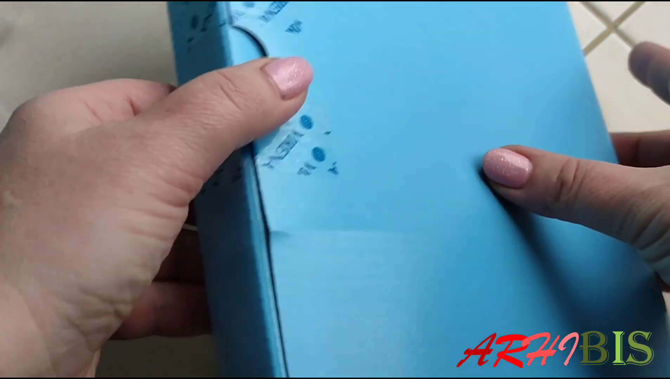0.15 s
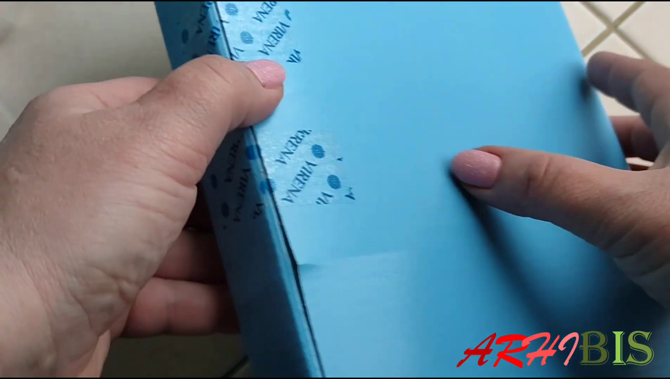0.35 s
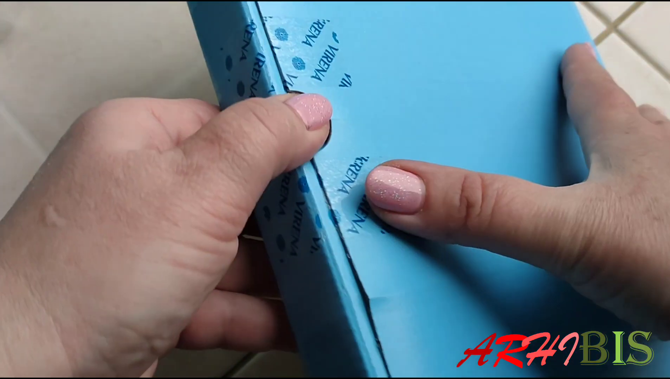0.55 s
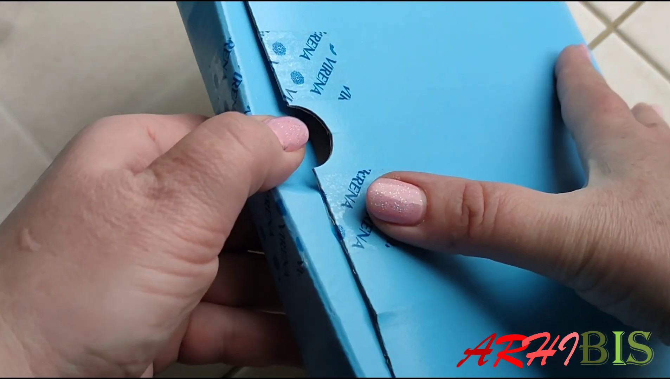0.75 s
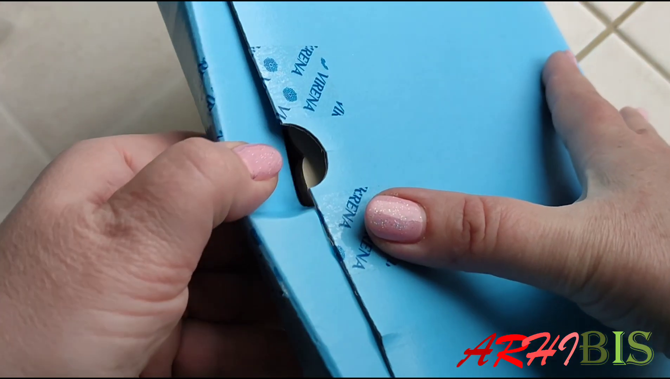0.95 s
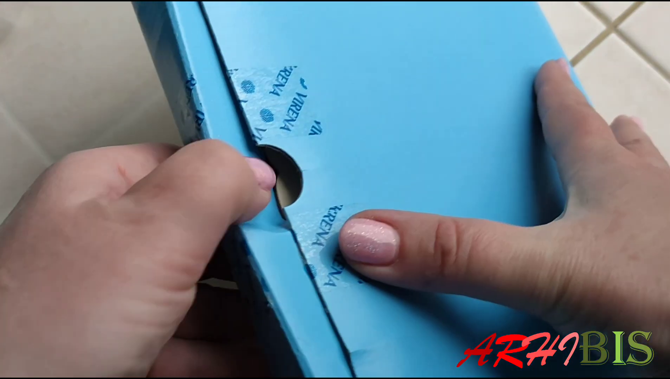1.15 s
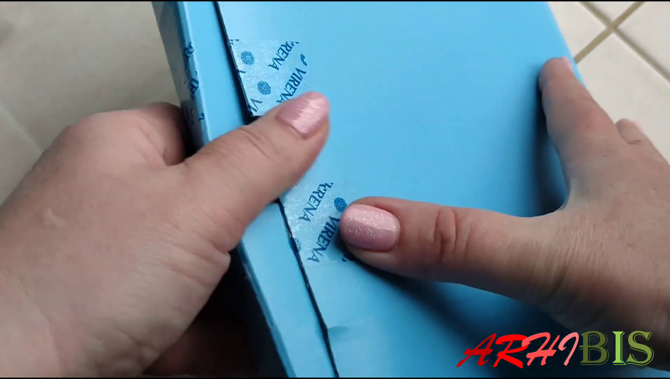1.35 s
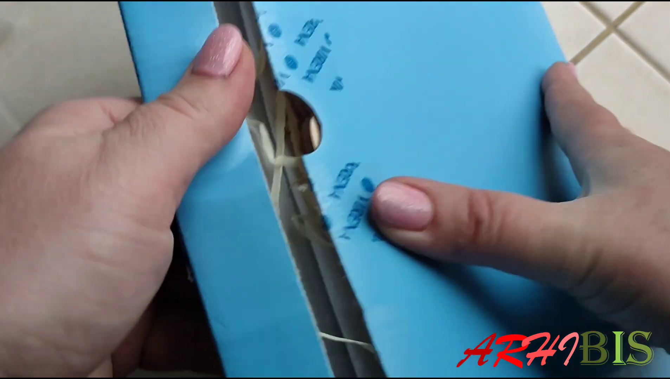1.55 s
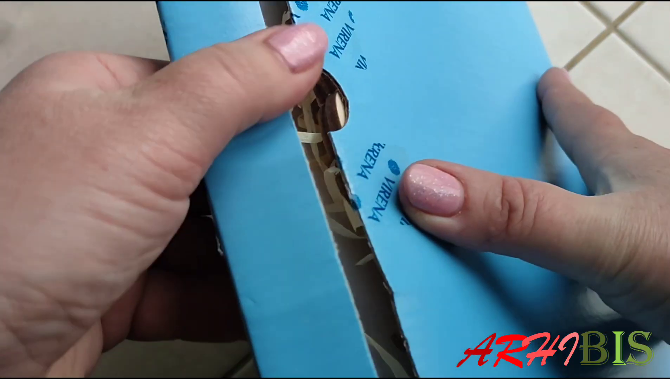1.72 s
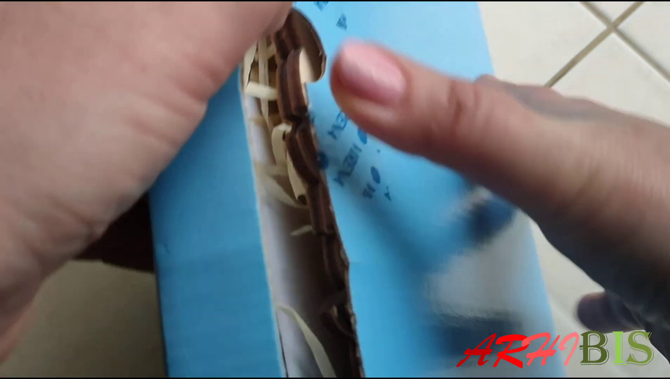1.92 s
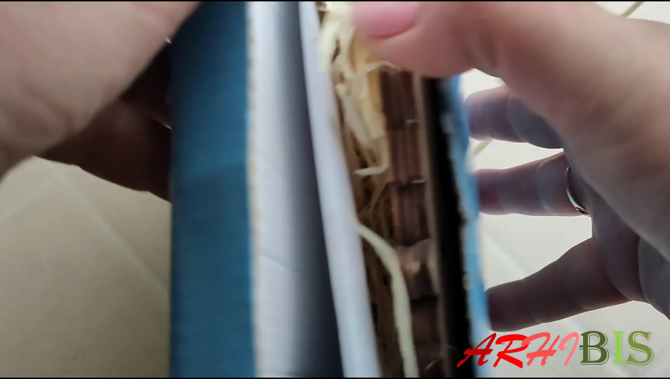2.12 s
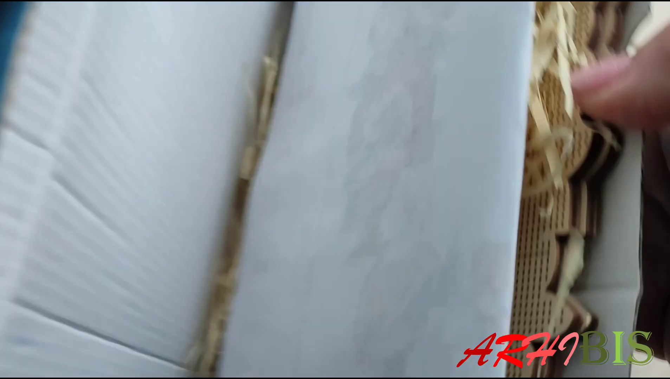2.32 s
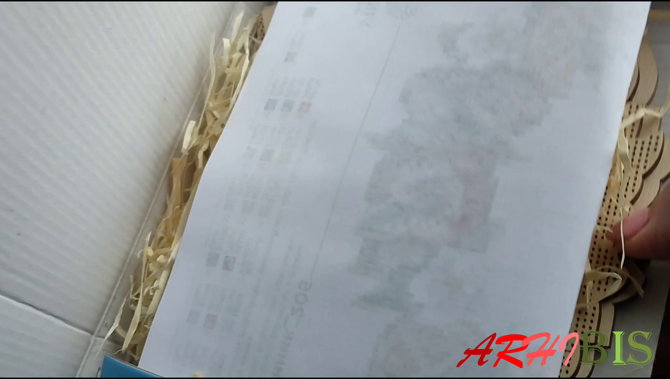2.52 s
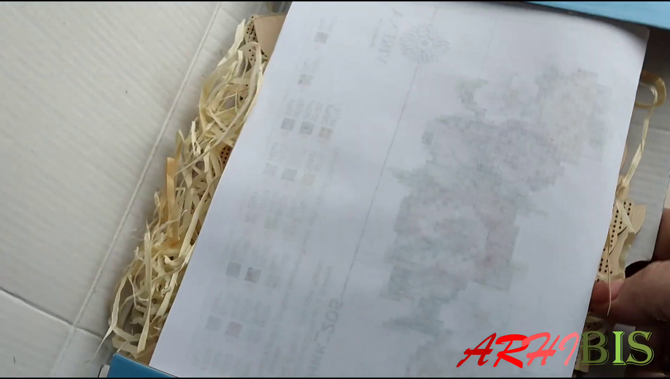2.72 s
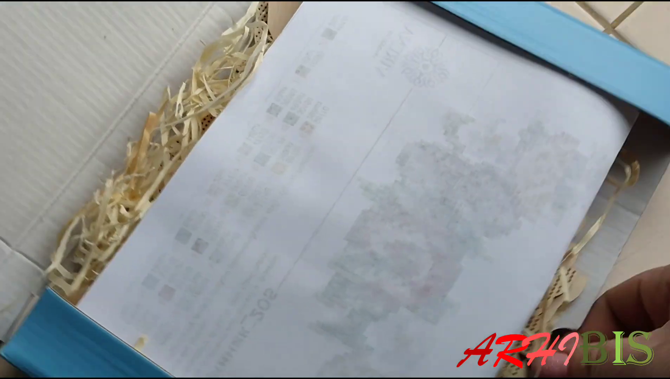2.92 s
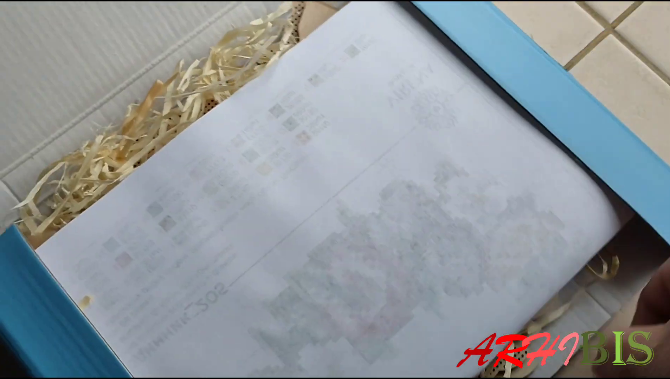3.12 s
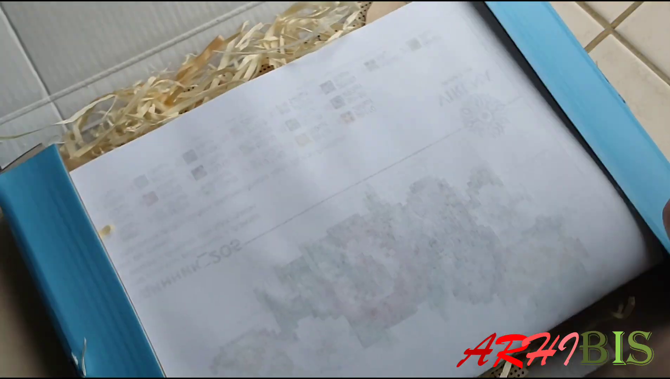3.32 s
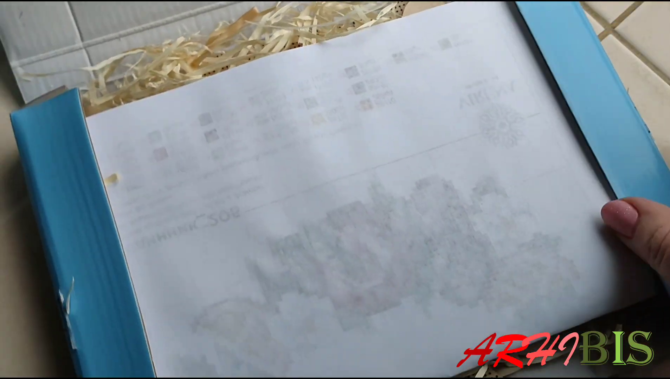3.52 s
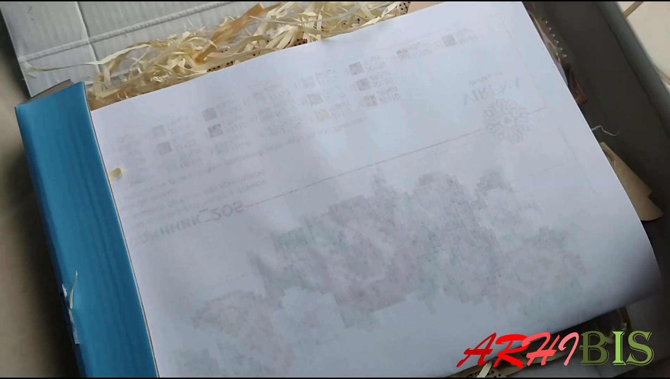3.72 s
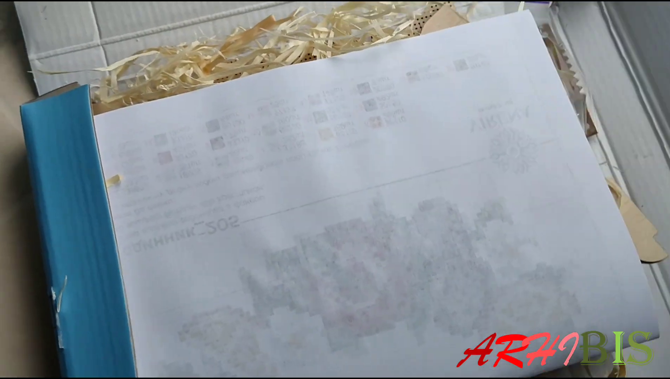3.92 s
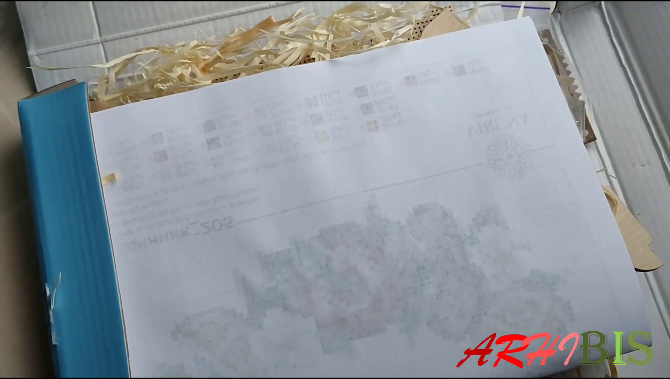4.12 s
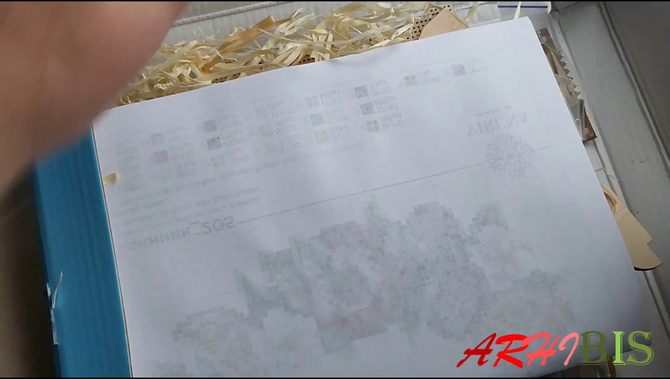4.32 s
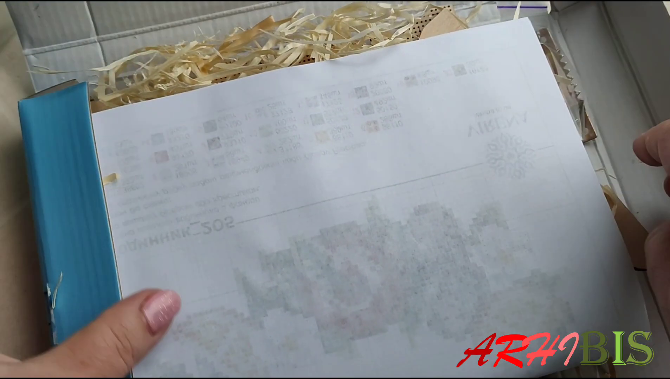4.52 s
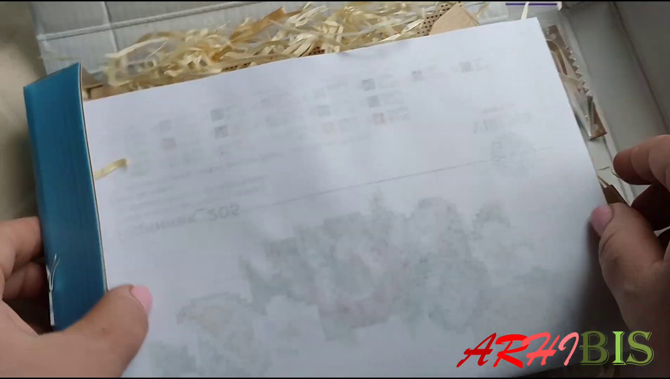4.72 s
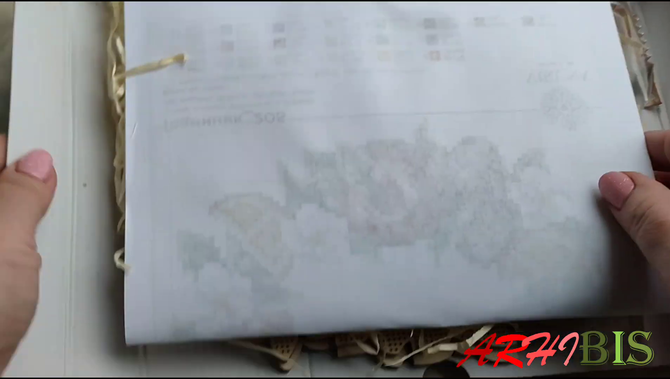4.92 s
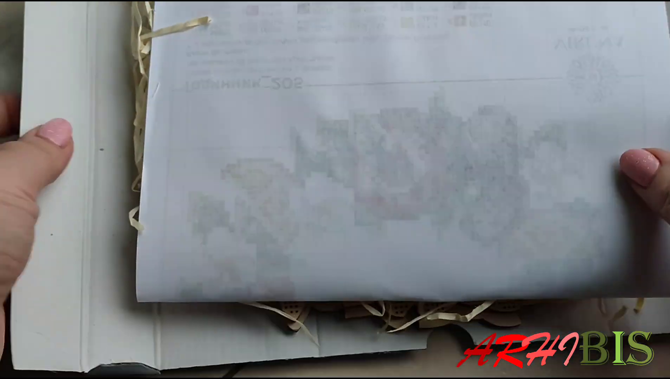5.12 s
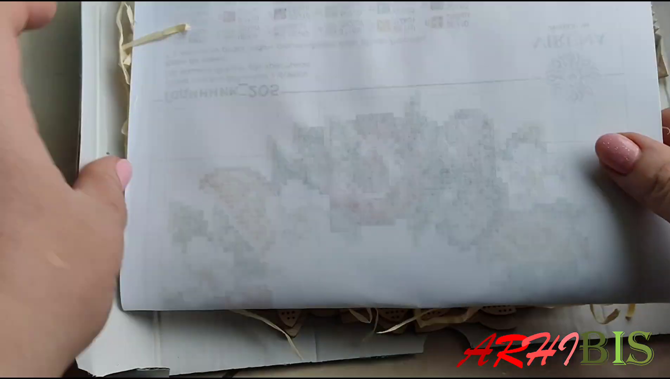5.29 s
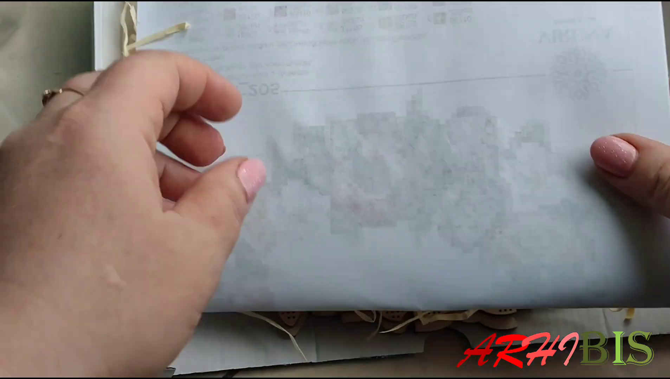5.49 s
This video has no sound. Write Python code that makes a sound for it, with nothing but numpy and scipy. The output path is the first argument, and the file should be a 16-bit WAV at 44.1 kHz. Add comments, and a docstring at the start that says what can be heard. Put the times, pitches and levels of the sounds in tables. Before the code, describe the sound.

A cardboard lid rasps and pops free, followed by close hollow knocks, sliding card and hissing paper packing.

```python
"""A corrugated cardboard box knocks and scrapes as hands open it on a tiled floor, close to a phone.
Fingers and folding flaps ring its panels, edges and enclosed air; the lid's tab rasps and pops free.
Rubbing and dragging drive the same resonances, while paper and wood shavings hiss among short dry ticks.
The room answers the knocks and ticks; now and then a faint thin squeak sounds over the room tone."""
import sys
import numpy as np
from scipy import signal
from scipy.fft import rfft, irfft, next_fast_len
from scipy.io import wavfile
from scipy.ndimage import uniform_filter1d, map_coordinates

SR = 44100
rng = np.random.default_rng(int(sys.argv[2]) if len(sys.argv) > 2 else 0)


def digitize_waveform(pressure):
    """Quantize a signal to 16-bit integers and store it at the path in sys.argv[1].

    Rows of a 2-D input are taken as channels; values are limited to [-1, 1].
    """
    field = np.atleast_2d(pressure).T
    bounded = np.clip(field, -1, 1)
    quanta = np.round(bounded * 32767).astype(np.int16)
    wavfile.write(sys.argv[1], SR, quanta)


N = 244755

# Box resonances: (frequency [Hz], width [Hz], gain [dB])
AIR_MODES = [(314.5, 73, -8.5), (379.5, 19, 0.5), (491.6, 35, -5.5), (608, 12, -5.5)]
PANEL_MODES = [(675, 71, -6), (839, 49, 0), (916, 51, -1), (1100, 100, -7), (1255, 120, -6.5)]
EDGE_MODES = [(1540, 320, -7.5), (1908, 140, 2.5), (2038, 240, -0.5), (2485, 220, -3.5), (2660, 180, -2),
              (3350, 540, -4.5), (3700, 1000, -9)]  # stiff folds and thin wood
# Air mode that moves as lid and flaps change the opening: (time [s], frequency [Hz])
OPENING_MODE = [(0, 512), (0.42, 590), (0.97, 387), (1.2, 430), (1.5, 597), (2.3, 640), (2.46, 348),
                (3.74, 392), (3.8, 467), (4.2, 412), (5.25, 451)]
# Blows, from hard edges to padded fingers and flaps:
# (time [s], level [dB], softness [0-1], struck spot [Hz], air gain [dB], crack gain [dB], L-R [dB])
BLOWS = [(0.006, -47.5, 1, 925, 13, -32, 5.5), (0.189, -66, 0.7, 700, 14, -1, 4.5),
         (0.286, -73.5, 1, 855, 24, 8, 5), (0.359, -77.5, 1, 1340, 25.5, 1, 4),
         (0.418, -55.5, 0.06, 910, 11, -0.5, 4), (0.59, -64, 0.1, 1240, 6, 5, 4),
         (0.968, -38, 0.04, 1164, 7, -3, -2), (1.135, -57.5, 1, 780, 15.5, -3, 3),
         (1.164, -40.5, 0, 963, -3, 0.5, 3), (1.235, -67, 0.9, 690, 15.5, -7, 2),
         (1.504, -44.5, 0.47, 1200, 9.5, 12.5, 2), (1.565, -17.5, 0, 1240, 0.5, -6.5, 3),
         (1.575, -25, 0, 900, 6, -13, 1.5), (2.038, -40, 0, 795, 0, -23, 3),
         (2.175, -52, 0.2, 740, 2.5, -21, -7), (2.284, -39.5, 0.03, 750, -1, -6, 5),
         (2.323, -45.5, 0, 820, -3, -1, -8), (2.385, -49, 1, 790, 0, -7, -3.5),
         (2.461, -44.5, 1, 690, 1, -11, -7.5), (2.667, -38, 0, 1020, -2.5, -5, 5),
         (3.011, -34.5, 0, 765, -5.5, -12, -3.5), (3.066, -52, 0.1, 1240, 3, -4, 0),
         (3.239, -43, 0.96, 1510, -1, 5, 2.5), (3.264, -41.5, 0.6, 1990, -4, -1, -4.5),
         (3.498, -55, 0.7, 1460, 6.5, 6, 3), (3.565, -45.5, 0, 1440, -1, -13, 2.5),
         (3.592, -50, 0, 1150, 3.5, -3, -2), (3.711, -62.5, 1, 1000, 15.5, 8, 3),
         (3.735, -39, 0, 870, -0.5, 0, -3), (3.786, -42.5, 0, 730, 4.5, -1, -1),
         (3.859, -45.5, 0.6, 1190, -5, 1, 2.5), (3.913, -57, 0.83, 900, 2.5, 0, 4),
         (3.958, -51, 0.15, 980, 4, 2, -1), (4.187, -52, 0, 835, 0, -12, 4),
         (4.228, -59, 0, 994, -7.5, 8.5, -3.5), (4.486, -65.5, 0.8, 856, -1, -2, 3),
         (4.519, -64.5, 0.92, 974, -2, 7.5, 2.5), (4.664, -62, 1, 1890, -4, 3.5, -3),
         (4.717, -51, 0.4, 1430, -17.5, -1, 2.5), (4.728, -45.5, 0, 1520, -6.5, 5.5, 7),
         (4.815, -54, 1, 1890, -8, 6, 1), (4.95, -45, 1, 736, 1, -3.5, -3.5),
         (5.02, -51, 0.74, 790, 9, -6, -3), (5.054, -51.5, 0.7, 1260, -7, 2, 3),
         (5.079, -57, 0, 1280, -8, 1, -0.5), (5.206, -42, 0.32, 1276, 8, 1, -2.5),
         (5.215, -44, 0.77, 1340, 3.5, -2.5, 5), (5.26, -54, 0.85, 1710, 13, -10, -2.5),
         (5.287, -57.5, 0.9, 1970, 10.5, 5, 7), (5.301, -50.5, 0.24, 1700, -13, 10, -2),
         (5.331, -56.5, 1, 1820, 6.5, 7, 1)]


def blows(wet_db):
    """A contact force rings the air, panels, struck spot and edges; its rough part cracks."""
    out, t = np.zeros((2, N + SR)), np.arange(SR // 3) / SR
    hard, soft = np.array([[0.0013, 0.0061, 1.3], [0.01, 0.01, 6.3]])  # (rise [s], decay [s], roughness)
    grip_decay_s = 0.028  # hands damp the card
    port_delay_s_per_db = 22e-6  # the louder port is nearer and hears the blow first
    for time_s, level_db, softness, spot_hz, air_db, crack_db, pan_db in BLOWS:
        rise_s, decay_s, roughness = hard * (soft / hard) ** softness
        # A broad blow wakes the air, lasts longer and rings the edges less.
        decay_s *= amp(0.48 * (air_db - 0.5))
        edge_db = -6 - 0.64 * air_db
        grit = (1 - np.exp(-t / rise_s)) * np.exp(-t / decay_s) * rng.standard_normal((3, len(t)))
        force = roughness * grit[0] + np.exp(-t / 0.00011)
        opening_hz = np.interp(time_s, *np.transpose(OPENING_MODE))
        air = amp(air_db) * ring(force, AIR_MODES + [(opening_hz, 55, 1.5)])
        panel = ring(force, PANEL_MODES) + 0.75 * ring(force, [(spot_hz, 0.037 * spot_hz, 0)])
        edge = amp(edge_db) * ring(force, EDGE_MODES)
        thud = amp(-24.5) * ring(force, [(60, 210, 0)])
        gain = amp(level_db) * np.sqrt(decay_s * SR + 60)
        body = gain * np.exp(-t / grip_decay_s) * (panel + air + edge + thud)
        crack = gain * amp(crack_db) * ring(grit[1:], [(6900, 58000, 0)])
        lead = lambda hz: np.exp(np.outer([1, -1], 1j * np.pi * hz * pan_db * port_delay_s_per_db))
        direct = (filtered(body, lead) + crack) * amp([[pan_db / 2], [-pan_db / 2]])
        add(out, time_s, direct + reverb(body + crack[0], wet_db))
    return out[:, :N]


def tab():
    """The lid's tab rasps, swelling until it lets go."""
    release_s, release_db = 1.563, -26
    swell_db_per_s, fall_db_per_s = 649, 719.5
    t = np.arange(N) / SR - release_s
    level_db = release_db + np.minimum(swell_db_per_s * t, -fall_db_per_s * t)
    rasp = friction(resonant([(1180, 2300, -6.5), (6530, 17000, -10.5)]), rate_hz=400, flutter_db=-2.5)
    return amp(level_db) * rasp


# Sliding of hands and box: (time [s], card scrape [dB], paper and shavings hiss [dB])
RUB_LEVELS = [(0.0, -50, -58.5), (0.08, -59, -65.5), (0.15, -72.5, -75), (0.22, -67, -66.5),
              (0.5, -67.5, -67.5), (0.82, -67, -76.5), (0.92, -75, -80), (0.96, -67.5, -73),
              (1.0, -52.5, -60), (1.13, -60.5, -67), (1.2, -59.5, -55), (1.3, -64, -62.5),
              (1.43, -63.5, -65.5), (1.52, -43, -49), (1.7, -49, -51), (2.05, -50.5, -51.5),
              (2.4, -47.5, -47.5), (2.7, -53, -51.5), (2.92, -59, -58), (3.02, -49.5, -51.5),
              (3.27, -48, -45.5), (3.45, -52.5, -56), (3.53, -49, -52), (3.67, -60, -65.5),
              (3.78, -51, -57.5), (3.98, -57, -59.5), (4.06, -65, -70), (4.25, -67.5, -72.5),
              (4.36, -74.5, -81.5), (4.52, -71.5, -83.5), (4.7, -63.5, -65.5), (4.74, -55.5, -56),
              (4.82, -54, -54), (4.92, -52.5, -53), (5.08, -52, -55), (5.3, -57.5, -61.5),
              (5.42, -64, -67.5), (5.55, -71.5, -66.5)]
# Friction spectra: (frequency [Hz], relative density [dB])
SCRAPE_SPECTRUM = [(400, -32.5), (650, -9), (800, -6.5), (1300, -5.5), (2100, -7.5), (3200, -13.5),
                   (5000, -29.5), (9000, -94.5)]
HISS_SPECTRUM = [(900, -31.5), (1800, -7.5), (3000, -4), (6000, -1.5), (10000, -6), (16000, -7.5)]


def rubbing():
    """Sliding card drives the box's air, panels and edges; paper and shavings hiss."""
    scrape_db, hiss_db = curves(RUB_LEVELS)
    drone_db = -59.5 + 0.71 * (scrape_db + 55) + 3.5 * wobble(rate_hz=9)
    drone = friction(resonant(AIR_MODES), rate_hz=40, flutter_db=2.5)
    card = resonant(PANEL_MODES + EDGE_MODES)
    scrape_response = lambda hz: amp(log_interp(SCRAPE_SPECTRUM, hz)) * (1.2 + np.abs(card(hz)))
    scrape = friction(scrape_response, rate_hz=60, flutter_db=2.0, patch_db=2.3)
    hiss = friction(lambda hz: amp(log_interp(HISS_SPECTRUM, hz)), rate_hz=50, flutter_db=0.6, patch_db=1.9)
    return amp(drone_db) * drone + amp(scrape_db) * scrape + amp(hiss_db) * hiss


# Dry ticks: (time [s], level [dB], band centre [Hz])
TICKS = [(0.091, -47, 6800), (0.222, -46, 7400), (.986, -48, 11000), (2.140, -40, 14500),
         (2.556, -33, 9000), (2.658, -31, 15400), (2.680, -31.5, 15400), (3.690, -38, 13000),
         (3.726, -44, 9000), (4.010, -47, 8030), (4.037, -47, 6460), (4.096, -49, 13000),
         (4.198, -47, 9080), (4.422, -59, 11030), (4.480, -55.5, 4950), (5.127, -45, 7300),
         (5.303, -36, 3420), (5.383, -42, 5000), (5.483, -43.5, 13800)]


def ticks():
    """Short dry ticks, some very high and thin, each lasting a few milliseconds."""
    out, t = np.zeros((2, N + SR)), np.arange(SR // 8) / SR
    rise_s, decay_s = 0.0016, 0.0045
    envelope = (1 - np.exp(-t / rise_s)) * np.exp(-t / decay_s)
    for time_s, level_db, hz in TICKS:
        burst = envelope * rng.standard_normal((2, len(t)))
        tick = amp(level_db) * filtered(burst, resonant([(hz, 0.9 * hz, 0)]))
        add(out, time_s, tick + reverb(tick[0], wet_db=-13))
    return out[:, :N]


# Squeaks: (start [s], end [s], frequency [Hz], width [Hz], level [dB])
SQUEAKS = [(.61, .82, 3500, 35, -81), (.84, .94, 3500, 35, -87), (.76, .93, 7000, 50, -91),
           (1.2, 1.4, 3380, 30, -77), (1.64, 1.86, 3200, 100, -69), (1.62, 1.85, 5700, 120, -69),
           (2.86, 3.0, 1850, 100, -70), (3.08, 3.26, 2800, 100, -66)]


def squeaks():
    """Narrow bands of noise fade in and out as faint thin squeaks."""
    out, t = np.zeros(N), np.arange(N) / SR
    fade_s = 0.025
    for start_s, end_s, hz, width_hz, level_db in SQUEAKS:
        fade = np.clip(np.minimum(t - start_s, end_s - t) / fade_s, 0, 1)
        band = filtered(rng.standard_normal(N), resonant([(hz, width_hz, 0)]))
        out += amp(level_db) * fade * unit_rms(band)
    return out


# Room decay: (frequency [Hz], T60 [s])
ROOM_T60 = [(300, 0.35), (650, 0.36), (1200, 0.23), (4000, 0.22), (12000, 0.19)]


def reverb(x, wet_db):
    """The room returns a diffuse stereo tail that dies faster in the treble."""
    predelay_s = 0.008
    hz, t, spectra = signal.stft(rng.standard_normal((2, SR // 3)), SR, nperseg=256)
    decay = amp(-60 * t / log_interp(ROOM_T60, hz)[:, None])
    tail = signal.istft(spectra * decay, SR, nperseg=256)[1]
    delayed = np.pad(x, (round(predelay_s * SR), 0))[None]
    return amp(wet_db) * signal.fftconvolve(delayed, tail / np.linalg.norm(tail[0]), axes=1)[:, :len(x)]


# Room tone: (frequency [Hz], relative density [dB])
ROOM_SPECTRUM = [(30, -14.5), (200, 13.5), (400, 6), (800, 4), (1500, 3.5), (3000, -24.5), (6000, -26.5),
                 (16000, -49.5)]


def room_tone():
    """Faint, dull noise that wavers slightly."""
    return amp(-74) * friction(lambda hz: amp(log_interp(ROOM_SPECTRUM, hz)), rate_hz=6.3, flutter_db=0.7)


# Stereo likeness of the noise: (frequency [Hz], L-R correlation [0-1])
CORRELATION = [(250, 1), (640, 0.18), (1400, 0.021), (16000, 0.012)]


def friction(response, rate_hz, flutter_db, patch_db=0):
    """Stereo noise in uneven slips and shifting patches of colour, shaped by what it excites; rms 1."""
    def mid_side_response(hz):
        angle = np.arccos(log_interp(CORRELATION, hz)) / 2
        return response(hz) * [np.cos(angle), np.sin(angle)]

    spectra = signal.stft(rng.standard_normal((2, N)), nperseg=512)[2]
    patches = uniform_filter1d(rng.standard_normal(spectra.shape[1:]), size=3, axis=0)
    patches = unit_rms(uniform_filter1d(patches, size=14, axis=1))
    noise = signal.istft(spectra * amp(patch_db * patches), nperseg=512)[1][:, :N]
    mid, side = filtered(amp(flutter_db * wobble(rate_hz)) * noise, mid_side_response)
    return unit_rms(np.array([mid + side, mid - side]))


def ring(force, modes):
    """Modes driven by a force; energy 1."""
    motion = filtered(force, resonant(modes))
    return motion / np.linalg.norm(motion)


def resonant(modes):
    """Causal response of (frequency [Hz], width [Hz], gain [dB]) modes, alternating in sign."""
    return lambda f: sum((-1) ** k * amp(db) * 1j * f * width / (hz * hz - f * f + 1j * f * width)
                         for k, (hz, width, db) in enumerate(modes))


def filtered(x, response):
    """Apply a complex frequency response."""
    size = next_fast_len(x.shape[-1] + SR // 4)
    return irfft(rfft(x, size) * response(np.fft.rfftfreq(size, 1 / SR)), size)[..., :x.shape[-1]]


def wobble(rate_hz):
    """Smooth random curve with rate_hz knots a second."""
    knots = rng.standard_normal(int(N * rate_hz / SR) + 4)
    return map_coordinates(knots, [np.arange(N) * rate_hz / SR])


def curves(rows):
    """One value per sample for each column after the time."""
    times_s, *columns = np.transpose(rows)
    return [np.interp(np.arange(N) / SR, times_s, column) for column in columns]


def log_interp(points, hz):
    """Interpolate (frequency [Hz], value) points on a log axis."""
    knots_hz, values = np.transpose(points)
    return np.interp(np.log(hz + 1), np.log(knots_hz + 1), values)


def amp(db):
    return 10 ** (np.asarray(db) / 20)


def unit_rms(x):
    return x / np.sqrt(np.mean(x ** 2) + 1e-20)


def add(out, time_s, sound):
    out[:, round(time_s * SR):][:, :sound.shape[1]] += sound


def scene():
    """The box, its packing and the room, in stereo."""
    return rubbing() + tab() + blows(wet_db=-8.0) + ticks() + room_tone() + squeaks()


# Phone microphone: (frequency [Hz], gain [dB])
MIC_RESPONSE = [(30, -27.5), (185, -33.5), (232, -26.5), (282, -5.5), (340, -2), (4000, -2.5), (5000, -8),
                (5900, -4.5), (6800, 3), (8000, -2), (9500, -8), (13300, -11.5), (15400, -4.5)]


def record(dry):
    """The phone cuts the bass steeply, colours the treble at its ports and limits the band."""
    def minimum_phase(hz):
        cepstrum = irfft(np.log(amp(log_interp(MIC_RESPONSE, hz))))
        half = len(cepstrum) // 2
        cepstrum[1:half] *= 2
        cepstrum[half + 1:] = 0
        return np.exp(rfft(cepstrum))

    top_hz, taper_hz = 15930, 350
    band_limit = lambda hz: np.clip((top_hz - hz) / taper_hz, 0, 1) ** 2
    return filtered(filtered(dry, minimum_phase), band_limit)


dry = scene()
out = record(dry)
digitize_waveform(out)
```